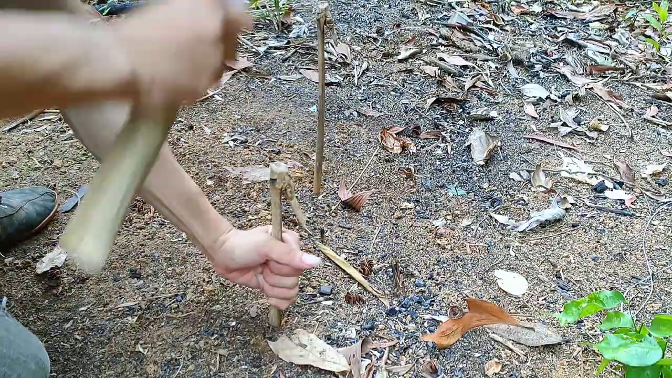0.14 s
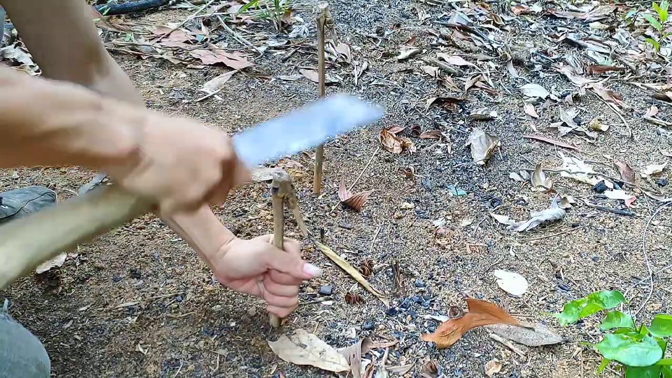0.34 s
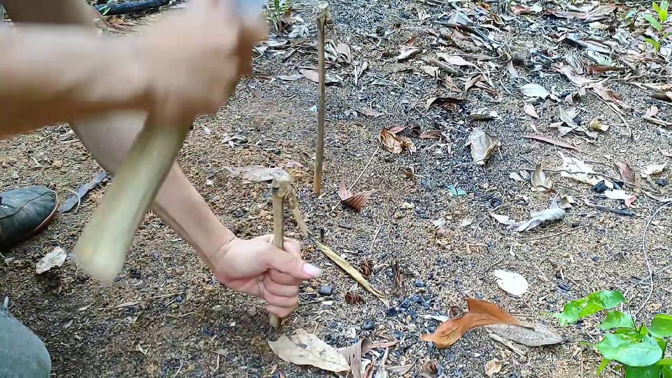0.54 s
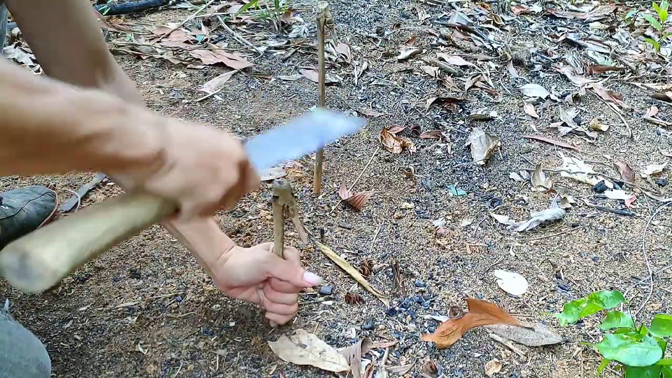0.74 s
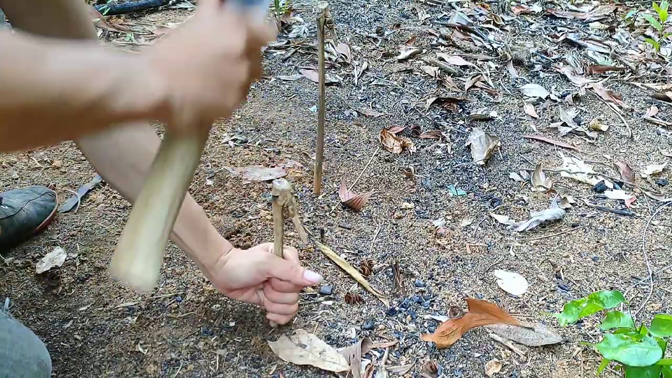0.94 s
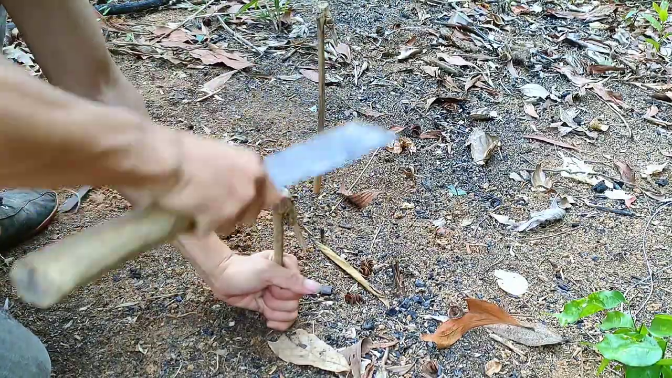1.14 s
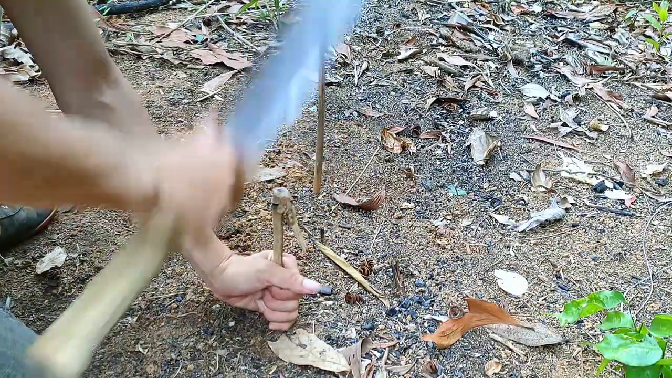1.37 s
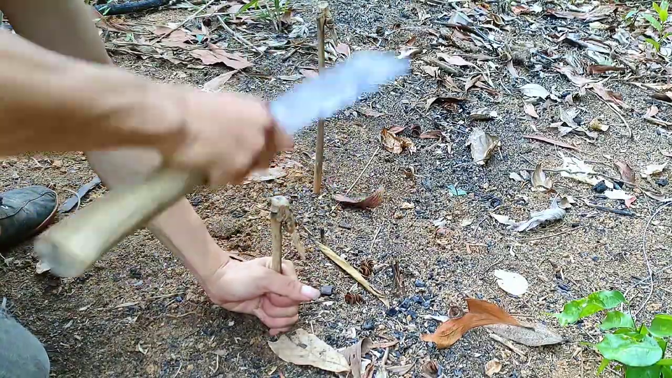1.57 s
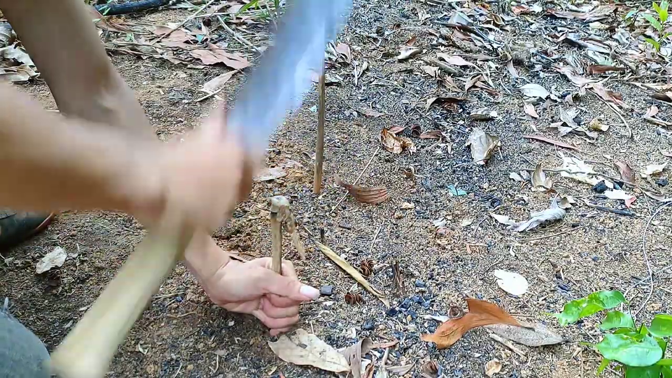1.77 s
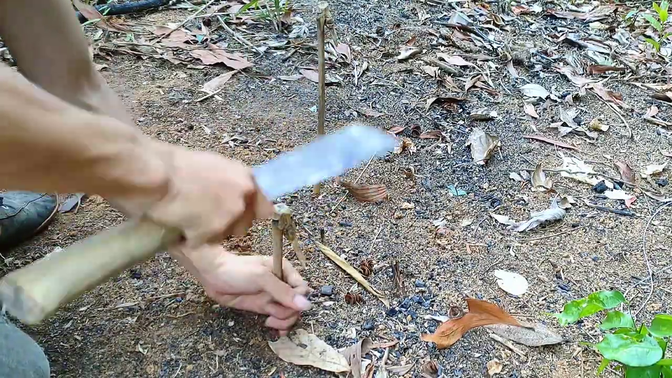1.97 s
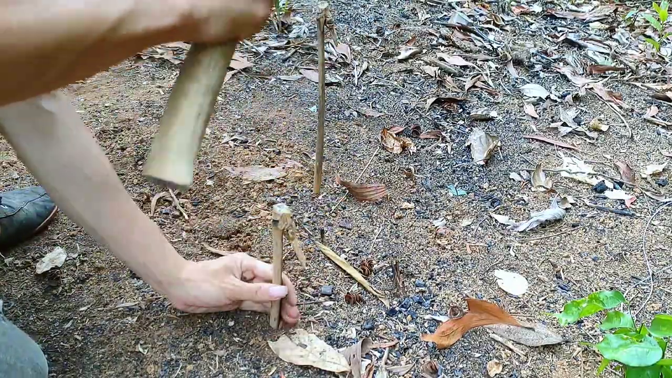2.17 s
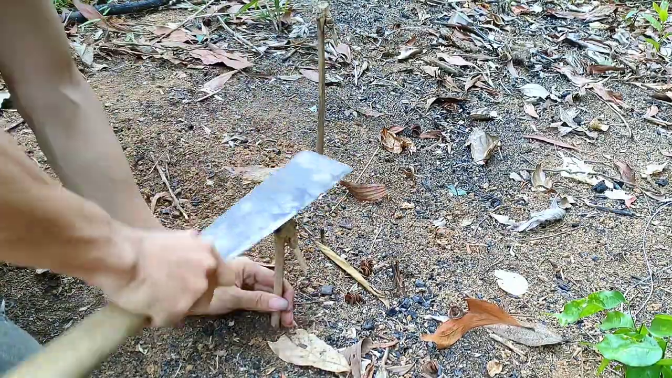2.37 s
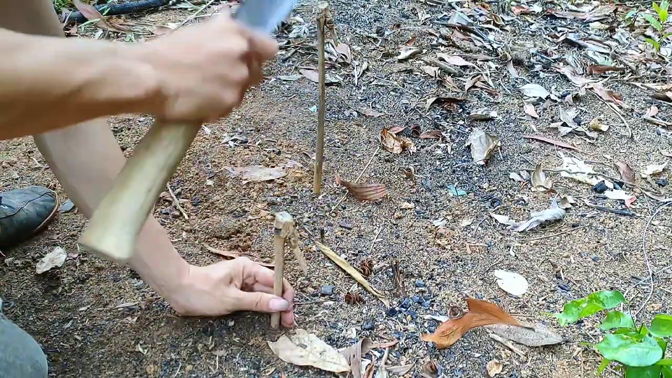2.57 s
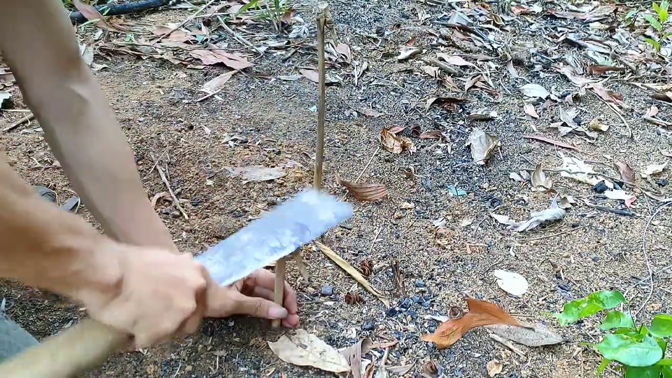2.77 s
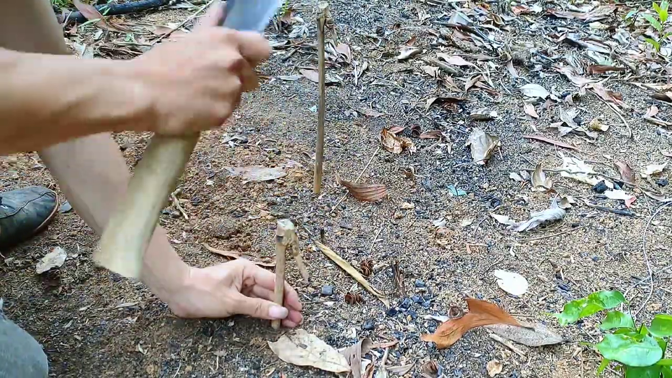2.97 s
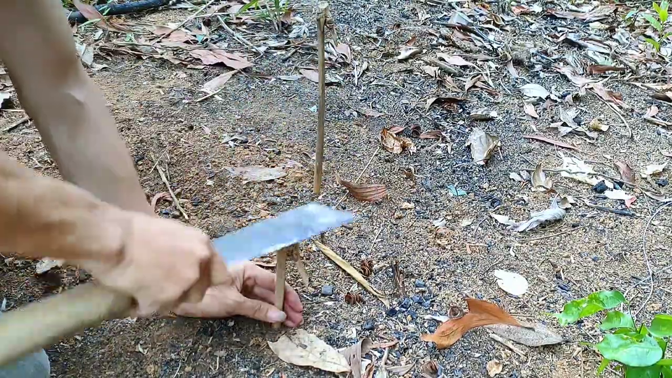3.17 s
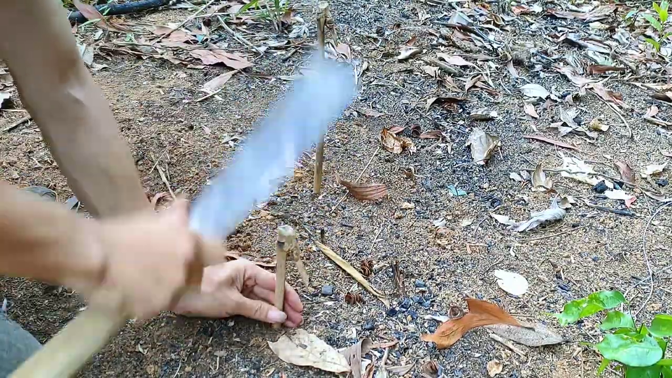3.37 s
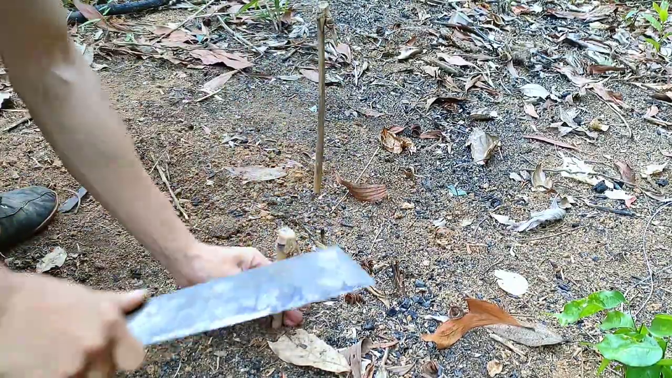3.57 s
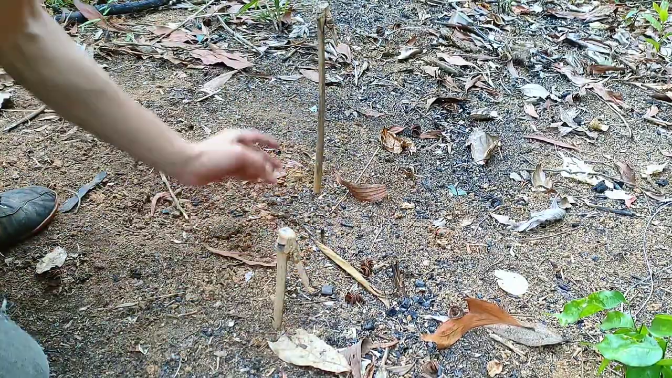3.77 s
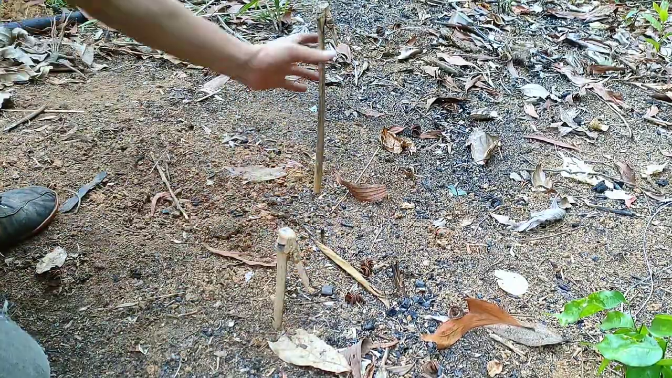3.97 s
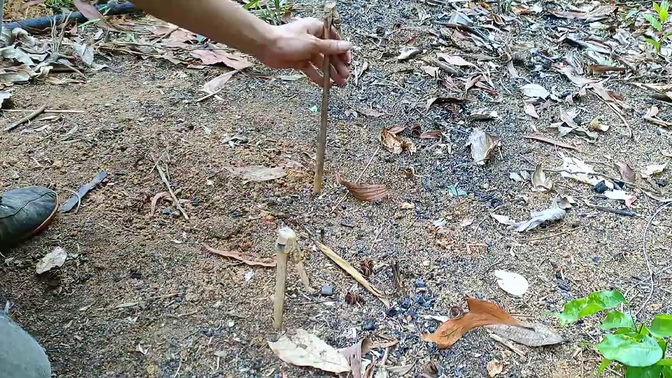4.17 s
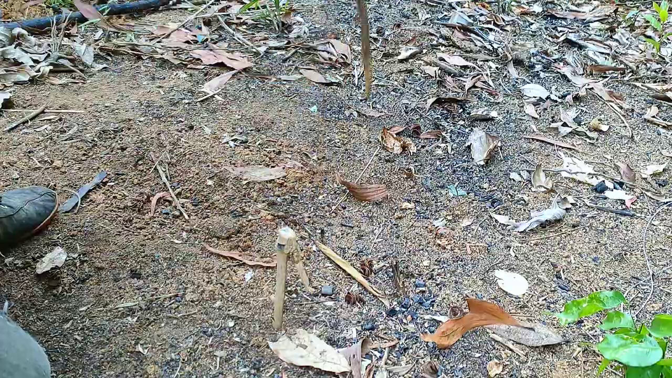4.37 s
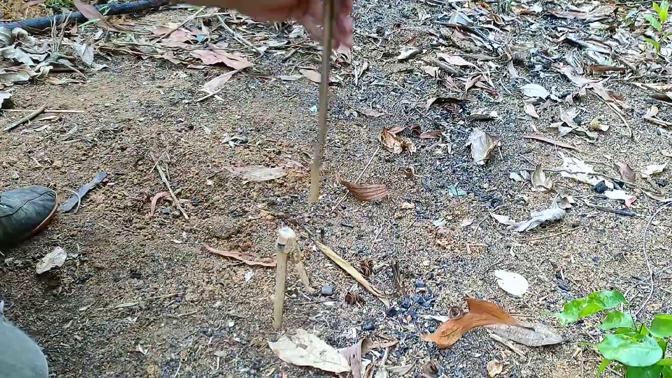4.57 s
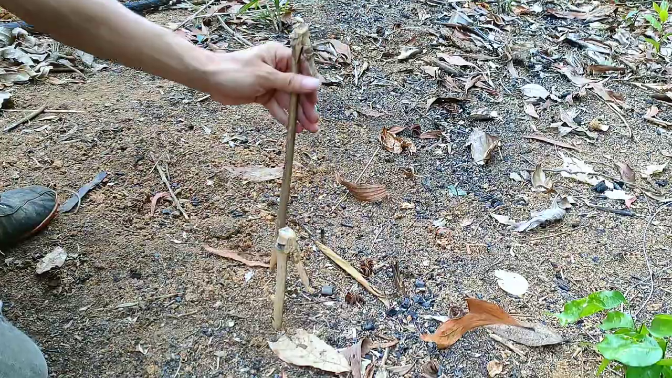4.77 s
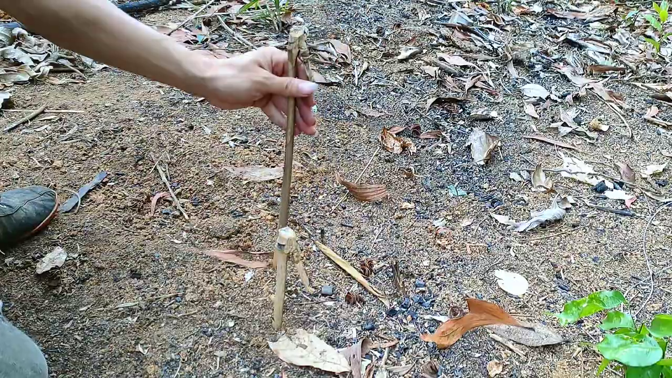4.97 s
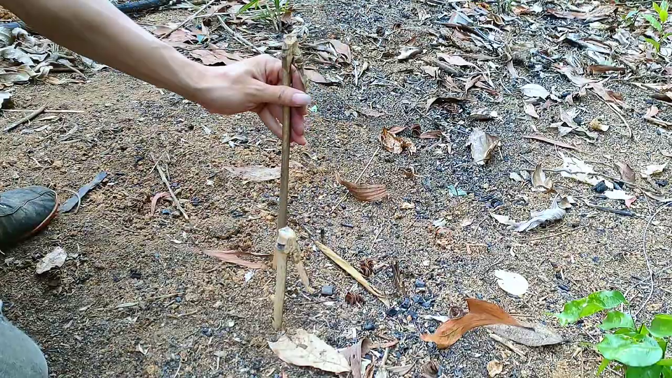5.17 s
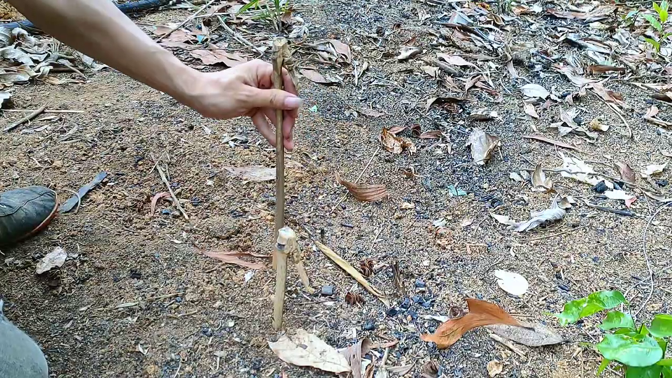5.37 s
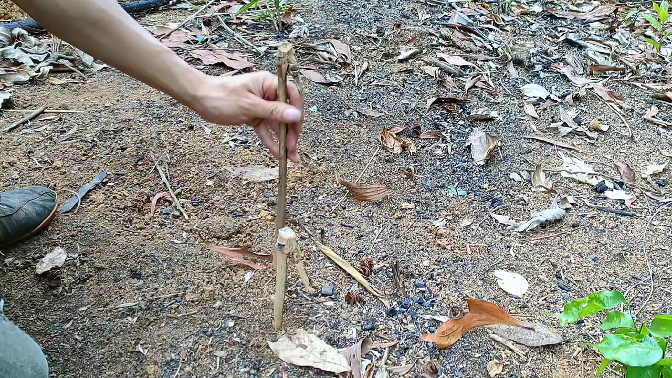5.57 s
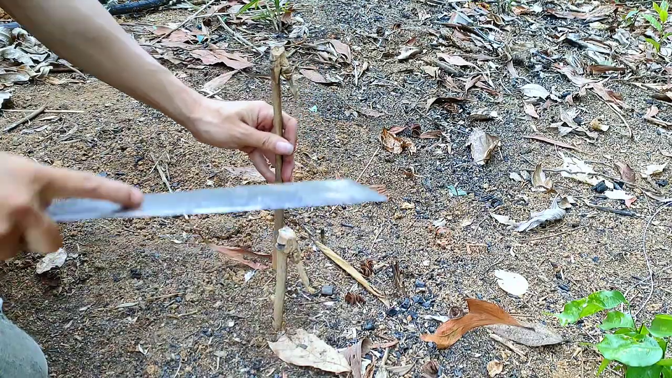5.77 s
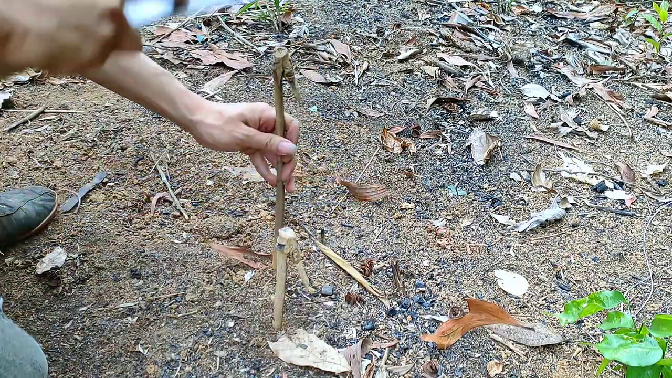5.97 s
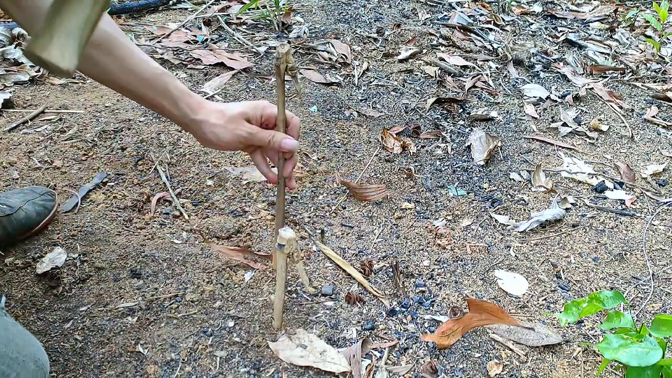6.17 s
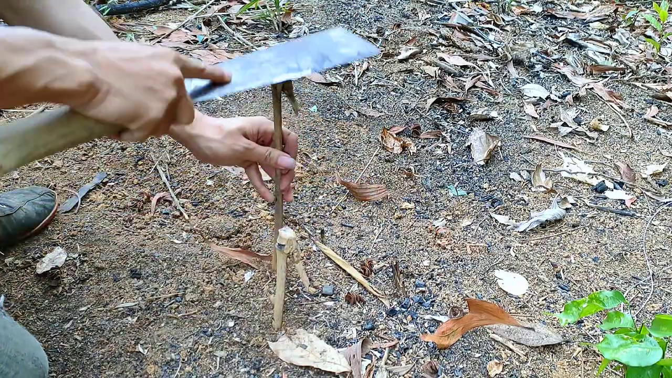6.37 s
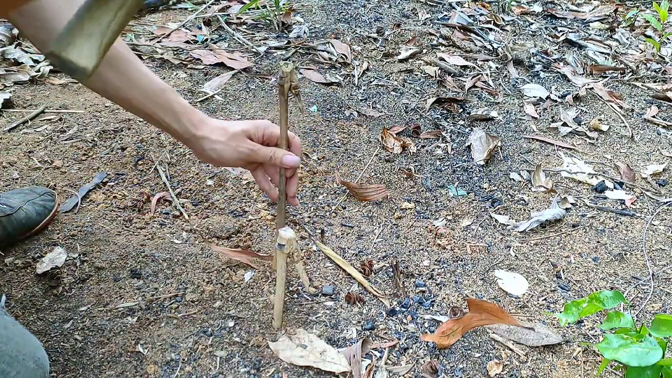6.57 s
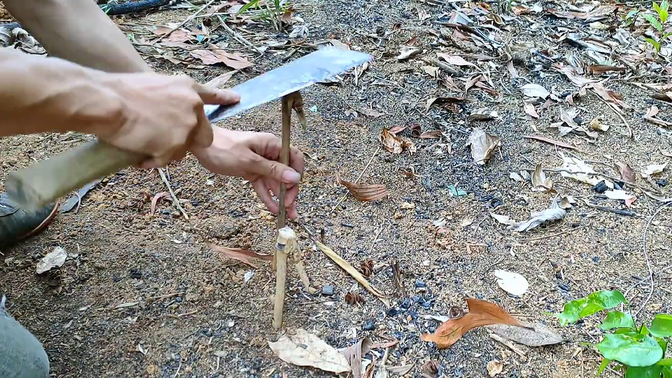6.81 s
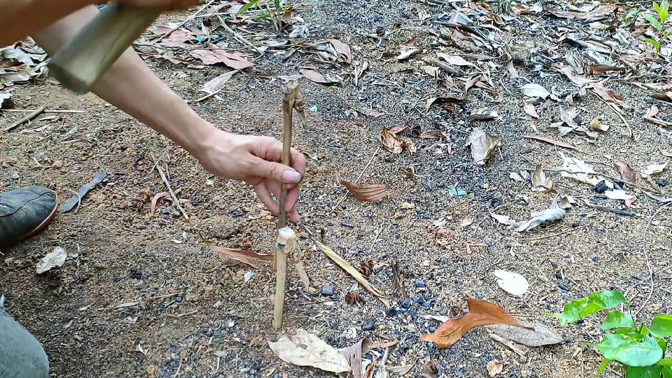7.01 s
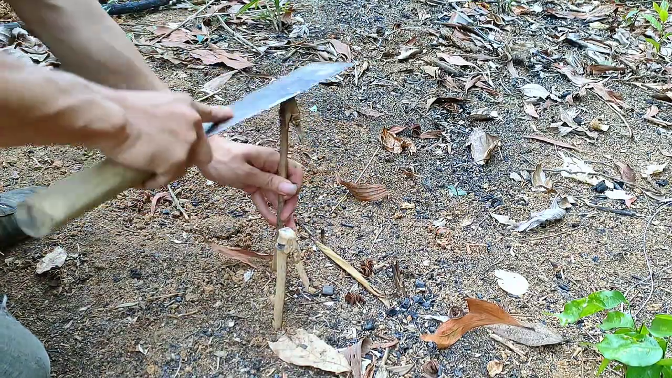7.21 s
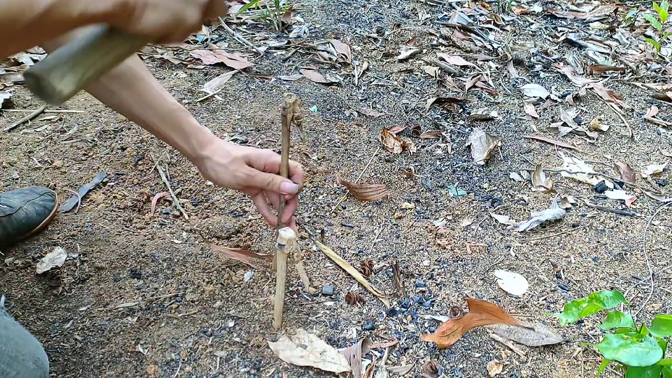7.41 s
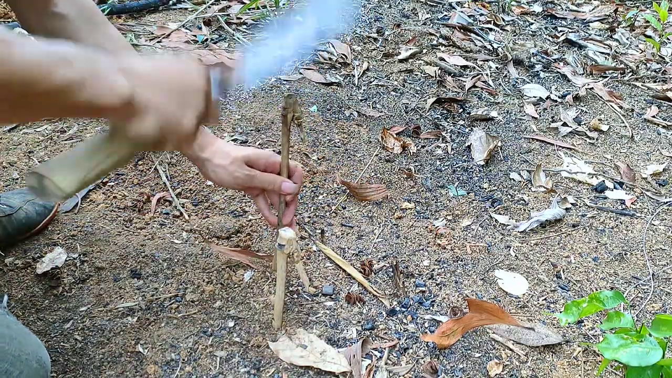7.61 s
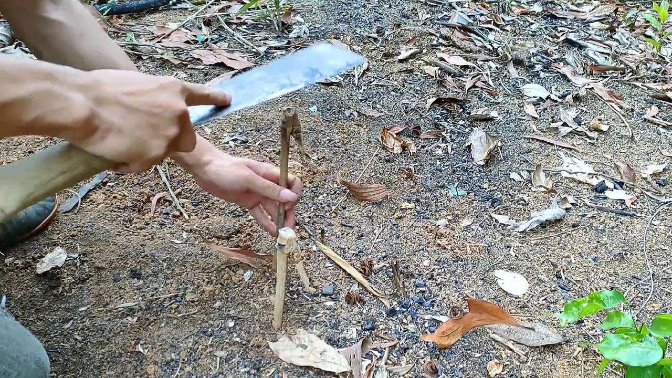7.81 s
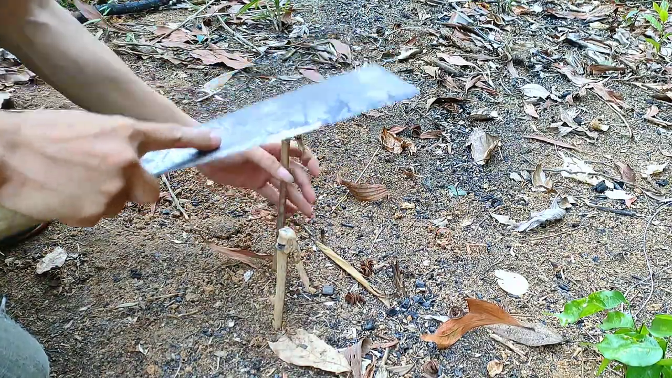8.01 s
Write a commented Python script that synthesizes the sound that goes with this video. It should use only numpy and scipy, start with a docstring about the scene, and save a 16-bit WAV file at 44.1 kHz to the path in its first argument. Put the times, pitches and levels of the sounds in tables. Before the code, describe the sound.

Sharp, close knocks of a blade's flat on wooden stakes, pausing midway, with cicadas and a bird faint in the woods.

```python
"""Sharp knocks, an arm's length from a stereo microphone: the flat of a long steel blade drives thin
wooden stakes into forest soil. Each blow cracks, rings stake and blade and comes back from the trees;
many rebound. Between the two stakes the blade is laid down, scraping and ringing, and dry leaves crunch.
Farther off a bird whistles, a cricket trills and cicadas buzz over the wash of the forest.
A limiter ducks everything under the loud blows."""
import sys
import numpy as np
from scipy import signal
from scipy.fft import rfft, irfft
from scipy.io import wavfile
from scipy.ndimage import uniform_filter1d, minimum_filter1d

SR = 44100
rng = np.random.default_rng(int(sys.argv[2]) if len(sys.argv) > 2 else 0)


def store_pcm(level_fs):
    """Save levels as 16-bit WAV."""
    pcm = np.round(np.clip(level_fs, -1, 1) * 32767).astype(np.int16)
    wavfile.write(sys.argv[1], SR, np.atleast_2d(pcm).T)


N = 355005

# Blade on stake, close up: (time [s], crack level [dB], extra weight [dB], extra body [dB],
# extra brightness [dB], air puff re crack [dB], stake pitch [Hz], stake ring re crack [dB], pan [dB]).
# Pan is left minus right throughout.
BLOWS = [(-.09, -27, -7, -5, -3, -19, 1370, -24, -2), (0.3107, -4, 11.5, 2, -1.5, -14, 1400, -34.5, 3.5),
         (0.713, -7.5, 5, 5, -1, -41, 1450, -23.5, -5), (1.1175, -3.5, 2.5, -9, 1.5, -19.5, 1300, -27, 0),
         (1.512, -4, -3, 5.5, -3.5, -36, 1300, -48, 1.5), (1.9172, -5, 1.8, 3, 1, -29, 1320, -21, -3.5),
         (2.4559, -4.5, -3, 2.5, -1.3, -14.5, 1440, -24, -1),
         (2.836, -1.5, -17, -6.5, 1, -18, 1356, -18.5, -2), (3.2, -3, 4.5, 1, -1.5, -12.5, 1357, -12, -4.5),
         (3.5146, -9, -5.5, 2.5, 2, -24.5, 1360, -12, -1.5),
         (6.3993, -15, -0.5, 5, 2.5, -30, 1300, -7.5, -1),
         (6.8718, -13, -8.5, 1.5, 0.5, -43.5, 1292, -3, -3), (7.2964, -8, -6.5, -5, 0.3, -32, 1320, -4, 4),
         (7.7308, -6.5, -4, -5, 1.5, -37, 1280, -11, 3.5)]
# Noise bands of a contact: (centre [Hz], t60 [s])
CRACK_BANDS = [(330, 0.082), (700, 0.013), (1400, 0.012), (2500, 0.015), (4300, 0.025), (7500, 0.027),
               (13000, 0.026)]
# A blow in those bands: (usual level [dB], share of weight [-], of body [-], of brightness [-])
BLOW_COLOUR = [(-19, 1.0, 0.099, -0.5), (-17.5, 1.0, 0.073, 1), (-8.5, 0.14, 0.97, 0.5), (1, 0.16, 0, 0),
               (0.07, 0.062, 0.014, 0.85), (2, 0, 0.078, 1.2), (-20.5, 0.021, 0, 3)]
# Ring of the wood: (multiple of stake pitch [-], level [dB], t60 [s])
STAKE_MODES = [(1, 0, .028), (1.15, -14, .06), (1.36, -1, .022), (2.1, -3, .025), (2.85, -2, .02)]
# Rings of the free steel, its handle and the soil: (frequency [Hz], relative level [dB], t60 [s])
BLADE_MODES = [(2654, -18, .07), (3483, -22, .09), (4587, -12, .085), (5308, -13, .09), (6250, -20, .07),
               (7267, -8, .16), (8332, 2, .15), (9485, -17, .05), (10770, -13, .065), (11080, -13, .07),
               (12020, -16, .08), (13290, -11, .045), (14740, -16, .1)]
HANDLE_MODES = [(970, 0, .1)]
SOIL_MODES = [(105.2, -35.5, 0.27)]
# Return from the trunks all round: (delay [s], relative level [dB])
ECHO_SHAPE = [(.012, 4.5), (.06, 3.5), (.11, -5), (.2, -18.5), (.45, -47.5)]
# Its spectrum: (frequency [Hz], relative level [dB])
ECHO_COLOUR = [(300, -26), (1200, -19), (2500, -4), (5500, -6.5), (7500, -1), (9000, -3.5), (10500, -8.5),
               (13000, -14.5)]
# The blade falls back or bumps the stake: (time [s], level [dB], brightness [dB], pan [dB])
REBOUNDS = [(0.355, -33, 0, -0.5), (0.751, -32, -1, 1), (1.171, -32, -23, 0), (1.567, -30, 3, 3.5),
            (1.985, -32, -27, -1), (1.997, -36, -5, -1), (2.893, -29.5, -25, -0.5), (3.587, -60.5, 11, -2),
            (5.543, -57.5, 7, 0), (7.343, -41, -5, -1), (7.801, -41.5, -10, -2)]
# The blade touches the ground: (time [s], scrape [dB], ring [dB], thud [dB], contact length [s])
GROUND_TOUCHES = [(3.898, -46, -31, -42.5, 0.0018), (3.8992, -47, -28, -40.5, 0.0029),
                  (3.904, -33, -47, -55.5, 0.0069), (4.0405, -31.5, -31, -42, 0.0032),
                  (4.102, -65, -51, -61, 0.0032), (5.501, -49, -58, -65, 0.0068)]
# Dry leaves and twigs underfoot: (time [s], level [dB], pan [dB], decay time [s])
CRUNCHES = [(4.293, -57, 4, 0.015), (4.584, -60, 0, 0.0094), (4.678, -54, -2.5, 0.02),
            (4.888, -57.5, -2, 0.038), (4.996, -60, 2.5, 0.007), (5.175, -56.5, 0.5, 0.03),
            (5.205, -50.5, 1, 0.017), (5.484, -54, -5, 0.022), (6.017, -56, -8, 0.012),
            (6.089, -51, 5, 0.0075), (6.108, -50.5, -1.0, 0.0068)]
# Faint crackle of the leaf litter: (time [s], level [dB])
RUSTLE_LEVEL = [(0, -84), (2.0, -70), (2.75, -78), (4.1, -70), (4.3, -82), (4.9, -78), (5.07, -57),
                (5.25, -81), (5.45, -60.5), (6.15, -71), (7.0, -67.5), (7.35, -85.5), (8.05, -73)]
# Spectrum of the leaves: (frequency [Hz], relative level [dB])
LEAF_COLOUR = [(2350, -73.5), (4000, -15), (5380, -5), (6470, -20), (7530, -19.5), (8160, -7.5),
               (14400, -12.5), (16000, -20)]
# Bird in the trees: (time [s], length [s], first pitch [Hz], last pitch [Hz],
# share held before the glide [-], level at the end [dB])
BIRD_NOTES = [(2.412, 0.033, 2900, 2740, .3, -55.5), (2.999, 0.11, 3016, 4670, 0.38, -51.5),
              (3.105, 0.023, 3030, 2375, .4, -68.5), (4.724, 0.052, 2680, 2520, 0.35, -64),
              (4.839, 0.06, 3310, 4750, 0.48, -56.5), (6.705, 0.089, 2956, 4470, .05, -53),
              (6.799, 0.023, 2990, 2363, 0.37, -66), (7.224, 0.068, 2900, 2970, .3, -57)]
# Cricket: (time of a chirp near the top of the swell [s], level [dB], time to fade by 10 dB [s])
TRILLS = [(1.901, -60.5, 0.42), (3.575, -61, .3), (4.542, -60.5, .25), (5.935, -61, .3),
          (6.685, -59.5, 0.41)]
# Cicadas, the narrow bands single near singers: (centre [Hz], width [Hz], level [dB], pan [dB])
CICADA_BANDS = [(7040, 410, -69.5, -20), (7100, 19, -61.5, -2), (6710, 41, -73.5, -6.5),
                (7420, 290, -60.5, -14), (7756, 80, -60, -1.5), (10200, 1000, -75, 0)]
# Swell of that chorus: (time [s], gain [dB])
CICADA_SWELL = [(0, 2), (1.9, -1), (2.15, 1.9), (3.0, -1), (3.55, 2), (4.8, 0.3), (5.65, 2.5), (6.0, -1.5),
                (7.7, 0), (8.05, 1)]
# Cicadas singing lower: (time [s], level [dB])
LOW_CICADA_LEVEL = [(0, -57.5), (0.6, -60.5), (1.05, -69), (1.95, -58), (2.8, -70), (3.3, -60),
                    (4.1, -60.5), (4.6, -69.5), (5.2, -58.5), (5.7, -65), (6.4, -58), (7.6, -69.5),
                    (8.05, -57.5)]
# Far wash of the forest: (frequency [Hz], relative level [dB])
WASH_COLOUR = [(12, -27), (20, -16.5), (49, -12), (305, -29), (2810, -34.5), (3420, -22), (3940, -36),
               (4410, -29), (5210, -17.5), (6170, -41), (7300, -14), (8410, -71.5), (10200, -68),
               (15200, -30), (16500, -76.5)]
# How alike the wash is left and right: (frequency [Hz], correlation [-])
WASH_LIKENESS = [(60, 1.0), (180, 0.75), (550, 0.06), (1650, -0.072), (4970, -0.24), (15000, -0.6)]
# Distant rumble: (time [s], level [dB])
RUMBLE_LEVEL = [(0, -74.5), (1.2, -71.5), (1.6, -90), (2.6, -94), (2.9, -74), (3.6, -72), (4.05, -79),
                (4.7, -72.5), (5.85, -62.5), (6.15, -76), (6.8, -67), (7.55, -70.5), (8.05, -78)]

GRIPPED_DB, PUFF_PAN_DB = -30.5, 7.5  # blade ringing in the fist; the puff favours the left microphone
SECOND_STAKE_S, ECHO_DB = 5, (-40.5, -57)  # the short stake is driven hard, the slender second one tapped
TRILL_HZ, TRILL_RISE_S, TRILL_TOP_S = 3607, .24, .03  # the swell peaks just after the listed chirp
CHIRPS_PER_S, SLOWING_PER_S2, SLOWEST_PER_S = 28, 23.4, 20.6  # every trill starts brisk and tires
CHIRP_FALL, SOFT_SAG_HZ_PER_DB = 0.055, 11.5  # share of pitch lost in a chirp; soft chirps sit lower
NOTE_SWELL_DB, WASH_DB = 9, -71.5
CEILING_DB, RELEASE_DB_PER_S, EDGE_HZ = -1.5, 446.0, 16700
DC_OFFSET = 0.0027  # steady voltage of the microphone stage


def blows():
    """Steel on wood at arm's length: a crack, a puff of air, ringing parts, the echo and the rebounds."""
    out, t = np.zeros((2, N)), np.arange(SR // 2) / SR
    puff = (t / 0.0019 - 1) * np.exp(-t / 0.0024) * np.minimum(t / 0.00082, 1)  # short suck, slow push
    # the fist damps the steel
    gripped = [(hz, db - 2.2 * (hz - 7000) / 1000, .7 * t60) for hz, db, t60 in BLADE_MODES]
    for s, db, *colour_db, puff_db, stake_hz, stake_db, pan in BLOWS:
        bands_db = np.dot(BLOW_COLOUR, [1, *colour_db])
        stake = [(ratio * stake_hz, level, t60) for ratio, level, t60 in STAKE_MODES]
        add(out, s, gain_of(db) * sides(pan) * crack(bands_db, rise_s=0.00029, shared=0.5))
        add(out, s, gain_of(db + puff_db) * sides(PUFF_PAN_DB) * puff / abs(puff).max())
        add(out, s, gain_of(db) * ring(SOIL_MODES, spread_db=0.5).mean(0))
        add(out, s, gain_of(db + stake_db) * ring(stake, spread_db=3))
        add(out, s, gain_of(GRIPPED_DB) * ring(gripped, spread_db=4))
        add(out, s, tree_echo(t, bands_db, db, far_db=ECHO_DB[int(s > SECOND_STAKE_S)]))
        add(out, s, gain_of(db - 36) * ring(HANDLE_MODES, spread_db=3))
    for s, db, bright, pan in REBOUNDS:
        bands_db = [0, 2.5, -3, bright, bright - 8, bright - 12, -40]
        add(out, s, gain_of(db) * sides(pan) * crack(bands_db, rise_s=0.0018, shared=0.97, stretch=0.92))
        add(out, s, gain_of(db - 20) * ring(HANDLE_MODES, spread_db=3))
    return out


def crack(bands_db, rise_s, shared, stretch=1):
    """One sharp contact and a burst of noise in bands, each dying at its own speed."""
    t = np.arange(4096) / SR
    noise = rng.standard_normal((3, len(t)))
    noise[0, round(1.3 * rise_s * SR)] += 5.18 / stretch  # the contact itself
    common = np.array([noise[0], np.roll(noise[0], shift=5)])  # reaches the right microphone later
    pair = shared * common + np.sqrt(1 - shared ** 2) * noise[1:]
    attack = 1 - np.exp(-(t / rise_s) ** 2)
    spike = 1 + 5.7 * np.exp(-t / (stretch * 0.0014))
    out = 0
    for db, (centre, t60) in zip(bands_db, CRACK_BANDS):
        passband = [(hz, 0 if hz == centre else -40) for hz, _ in CRACK_BANDS]
        envelope = attack * gain_of(-60 * t / (stretch * t60)) * spike
        burst = coloured(pair, passband) * envelope
        burst /= np.linalg.norm(burst, axis=1, keepdims=True)
        out += gain_of(db) * burst * np.linalg.norm(envelope / envelope.max())
    return out


def ring(modes, spread_db):
    """Dying sines; where the blow lands sets each strength, and each microphone gets its own phase."""
    hz, db, t60 = np.transpose(modes)[:, :, None]
    t = np.arange(9000) / SR
    strength = gain_of(db + spread_db * rng.standard_normal(hz.shape) - 60 * t / t60)
    sines = np.sin(2 * np.pi * (hz * t + rng.random((2, len(modes), 1))))
    return (strength * sines).sum(1) * np.minimum(t / 0.00017, 1)


def tree_echo(t, bands_db, blow_db, far_db):
    """A blow scatters back from far trunks, and from litter, legs and bushes within a few metres."""
    scatter = rng.standard_normal((2, len(t))) * gain_of(2.5 * rng.exponential(1, len(t)))
    blow_colour = [(hz, .5 * db) for (hz, _), db in zip(CRACK_BANDS, bands_db)]
    scatter = coloured(coloured(scatter, ECHO_COLOUR), blow_colour)
    far = gain_of(far_db + np.interp(t, *np.transpose(ECHO_SHAPE), left=-80))
    near = gain_of(blow_db - 27.5 - 60 * t / 0.41)
    return np.hypot(far, near) * unit_rms(scatter)


def blade_laid_down():
    """On the ground close by, the free blade scrapes grit and rings longer than in the fist."""
    out = np.zeros((2, N))
    for s, scrape_db, ring_db, thud_db, length in GROUND_TOUCHES:
        low_db = [thud_db + 3.5, thud_db, thud_db - 3]
        grit_db = [scrape_db - 21.5, scrape_db - 4, scrape_db + 0.5, scrape_db - 14]
        add(out, s, crack(low_db + grit_db, rise_s=length / 4, shared=0.96, stretch=length / 0.0017))
        add(out, s, gain_of(ring_db) * ring(BLADE_MODES, spread_db=2))
    return out


def leaves():
    """The forest floor crunches in many tiny snaps, over a faint crackle."""
    level = gain_curve(RUSTLE_LEVEL) * np.ones((2, 1))
    for s, db, pan, decay_s in CRUNCHES:
        t = np.arange(0, 5 * decay_s, 1 / SR)
        add(level, s, gain_of(db) * sides(pan) * np.exp(-t / decay_s))
    sizes = gain_of(2.2 * np.minimum(rng.exponential(1, (2, N)), 4))
    snapping = rng.random((2, N)[1]) < 5000 / SR  # snaps a second
    snaps = sizes * snapping * rng.standard_normal((2, N))
    filter_gain = coloured(snaps, LEAF_COLOUR).std() / snaps.std()
    return coloured(level * unit_rms(snaps), LEAF_COLOUR) / filter_gain


def bird():
    """Near-pure whistles that glide and grow louder, smeared a little by the trees."""
    out = np.zeros((2, N))
    for s, length, first_hz, last_hz, held, db in BIRD_NOTES:
        progress = np.arange(0, 1, 1 / (length * SR))
        glide = np.sin(np.pi / 2 * np.clip((progress - held) / (1 - held), 0, 1)) ** 2
        hz = first_hz + (last_hz - first_hz) * glide
        note = np.sin(2 * np.pi * np.cumsum(hz) / SR) * signal.windows.tukey(len(hz), .2)
        note *= flutter(len(hz), depth_db=3, smoothing=200)  # leaves in the path
        add(out, s, np.sqrt(2) * gain_of(db + NOTE_SWELL_DB * (progress - 1)) * note)
    tail = rng.standard_normal((2, 5000)) * gain_of(-60 * np.arange(5000) / SR / .15)
    smear = signal.fftconvolve(out, tail / np.linalg.norm(tail[0]), axes=1)[:, :N]
    return out + gain_of(-5) * smear


def cricket():
    """Trills of short falling chirps that swell, slow down and fade; the loudest trill sets the beat."""
    level, cycles, soft_db = np.zeros((3, N))
    t = np.arange(N) / SR
    for s, db, fade_s in TRILLS:
        since_top = t - s - TRILL_TOP_S
        under_db = 10 * (since_top / np.where(since_top < 0, TRILL_RISE_S, fade_s)) ** 2
        swell = gain_of(db - under_db)
        soft_db = np.where(swell > level, np.minimum(under_db, 20), soft_db)
        count = np.cumsum(np.maximum(CHIRPS_PER_S - SLOWING_PER_S2 * (t - s), SLOWEST_PER_S)) / SR
        cycles = np.where(swell > level, count - count[round(s * SR)], cycles)
        level = np.maximum(level, swell)
    phase = (cycles + .5) % 1 - .5
    chirps = .25 + np.exp(-(phase / .25) ** 2)  # the trees fill the gaps
    hz = (TRILL_HZ - SOFT_SAG_HZ_PER_DB * soft_db) * (1 - CHIRP_FALL * phase)
    return level * unit_rms(chirps * band(rng.standard_normal((2, N)), hz, width_hz=170))


def cicadas():
    """A chorus buzzes in steady bands, mostly off to the right; a lower group throbs."""
    out = sum(gain_of(db) * sides(pan) * unit_rms(band(rng.standard_normal((2, N)), hz, width))
              for hz, width, db, pan in CICADA_BANDS) * gain_curve(CICADA_SWELL)
    throb = flutter(N, depth_db=2.5, smoothing=1500)
    lower = unit_rms(throb * band(rng.standard_normal((2, N)), hz=5354, width_hz=650))
    out += gain_curve(LOW_CICADA_LEVEL) * sides(-2.5) * lower
    out[1] -= 0.13 * out[0]  # from far to the side, the two microphones get partly opposite pressure
    return out


def forest():
    """The far wash of the woods, alike in both microphones only in the bass, and a distant rumble."""
    left, unrelated = rfft(rng.standard_normal((2, N)))
    likeness = np.clip(per_bin(WASH_LIKENESS, N), -1, 1)
    right = likeness * left + np.sqrt(1 - likeness ** 2) * unrelated
    wash = coloured(irfft(np.array([left, right]), N), WASH_COLOUR)
    wash /= coloured(wash, [(199, -80), (200, 0), (2500, 0), (2501, -80)]).std()  # midrange to rms 1
    rumble = unit_rms(band(rng.standard_normal(N), hz=37, width_hz=30))
    return gain_of(WASH_DB) * wash + gain_curve(RUMBLE_LEVEL) * rumble


def gain_of(db):
    """dB to a factor."""
    return 10 ** (np.asarray(db) / 20)


def gain_curve(points):
    """A gain per sample from (time [s], level [dB])."""
    return gain_of(np.interp(np.arange(N) / SR, *np.transpose(points)))


def sides(pan_db):
    """Left and right gains."""
    return gain_of([[pan_db / 2], [-pan_db / 2]])


def unit_rms(x):
    """Scales to rms 1."""
    return x / np.sqrt(np.mean(x ** 2) + 1e-20)


def flutter(n, depth_db, smoothing):
    """A randomly wavering gain; smoothing is in samples."""
    return gain_of(depth_db * unit_rms(uniform_filter1d(rng.standard_normal(n), smoothing)))


def add(mix, s, sound):
    """Mixes a sound in from time s, which may lie before the start."""
    at = round(s * SR)
    sound = sound[..., max(-at, 0):]
    part = mix[:, max(at, 0):][:, :sound.shape[-1]]
    part += sound[..., :part.shape[1]]


def per_bin(points, n):
    """Reads a table on a log-frequency axis at the FFT bins of n samples."""
    hz, value = np.transpose(points)
    return np.interp(np.log(np.fft.rfftfreq(n, 1 / SR) + 1), np.log(hz + 1), value)


def coloured(x, points):
    """Filters by (frequency [Hz], level [dB])."""
    n = x.shape[-1]
    return irfft(rfft(x) * gain_of(per_bin(points, n)), n)


def band(x, hz, width_hz):
    """A steep resonance: shifts hz down to zero, smooths twice and shifts back."""
    carrier = np.exp(2j * np.pi * np.cumsum(hz * np.ones(x.shape[-1])) / SR)
    pole = np.exp(-np.pi * width_hz / SR)
    return (carrier * signal.lfilter([1], np.convolve([1, -pole], [1, -pole]), x / carrier)).real


def scene():
    """All sources at the microphones."""
    return blows() + blade_laid_down() + leaves() + forest() + cicadas() + cricket() + bird()


def record(dry):
    """A limiter sees each peak coming, holds the gain down and lets go quickly; then a low-pass."""
    over_db = np.maximum(20 * np.log10(abs(dry).max(0) + 1e-9) - CEILING_DB, 0)
    hold, ahead = round(.082 * SR), round(0.0019 * SR)
    span = hold + ahead
    held_db = -minimum_filter1d(-np.pad(over_db, (hold, ahead)), span + 1)[span // 2:][:N]
    release_db = np.arange(N) * RELEASE_DB_PER_S / SR
    duck_db = np.maximum.accumulate(held_db + release_db) - release_db
    limited = (dry + DC_OFFSET) / gain_of(uniform_filter1d(duck_db, ahead))
    low_pass = signal.firwin(511, EDGE_HZ, window=("kaiser", 9), fs=SR)
    return signal.oaconvolve(limited, low_pass[None], "same")


dry = scene()
out = record(dry)
store_pcm(out)
```